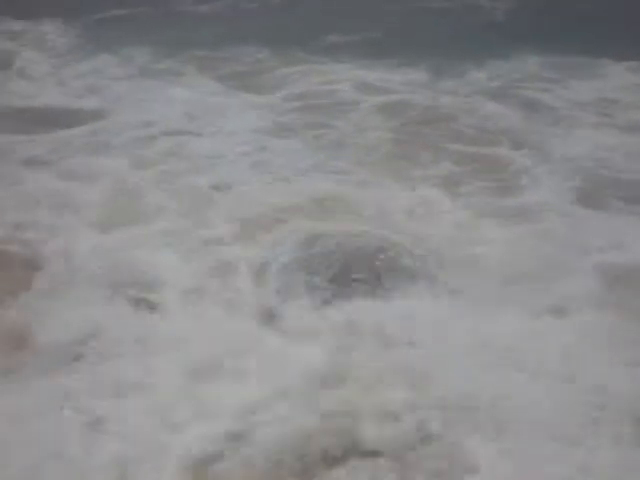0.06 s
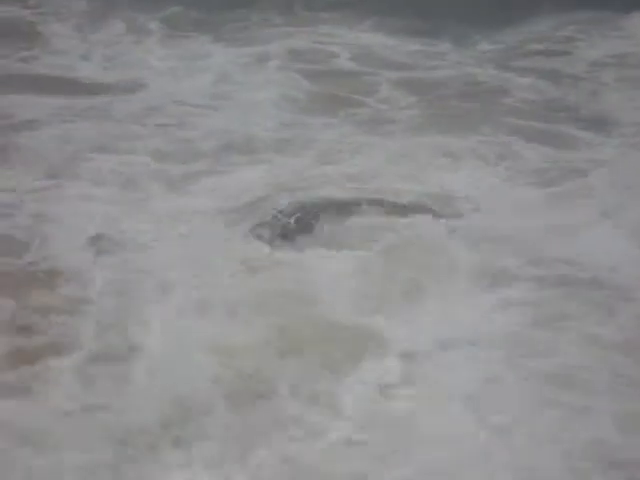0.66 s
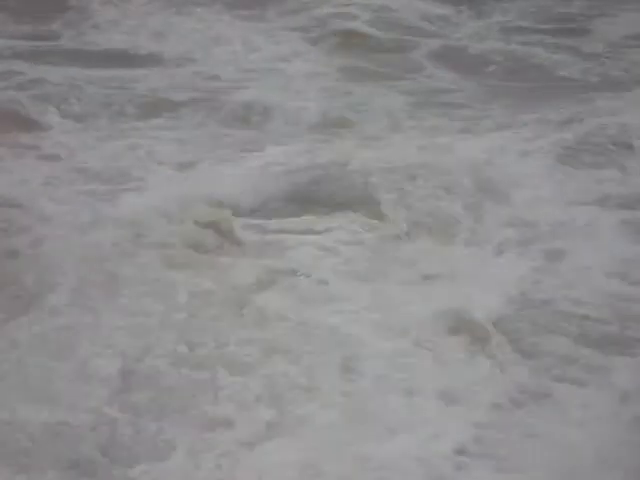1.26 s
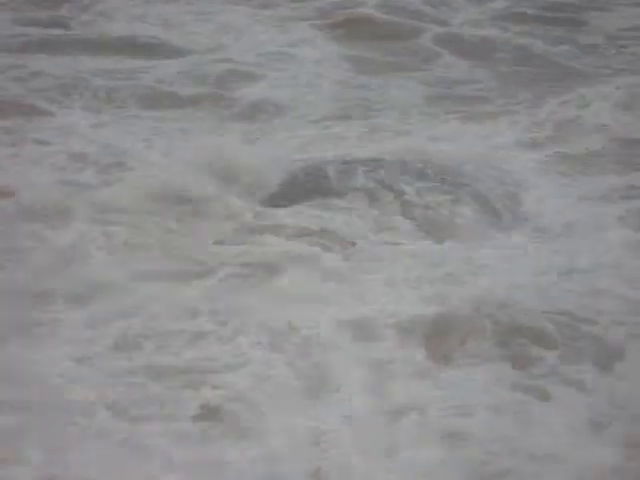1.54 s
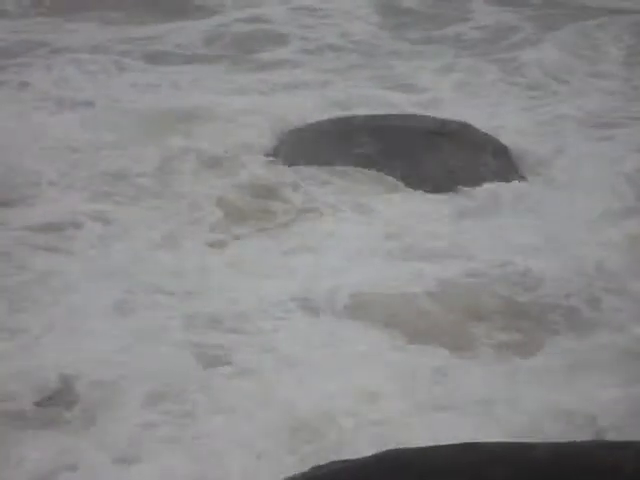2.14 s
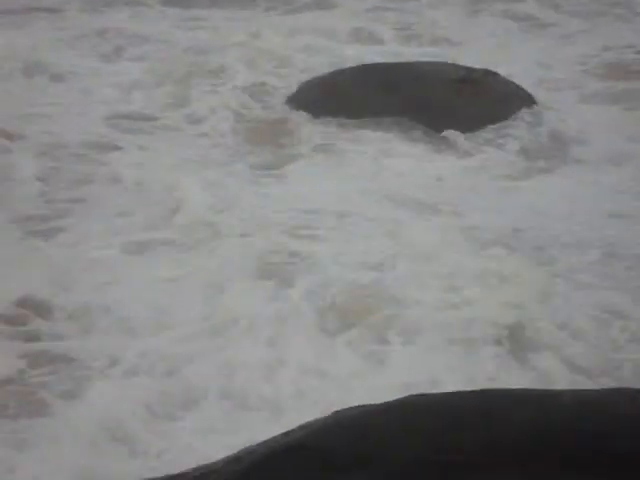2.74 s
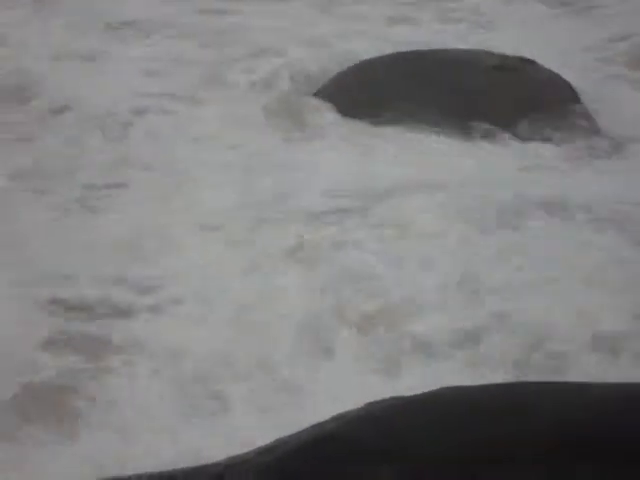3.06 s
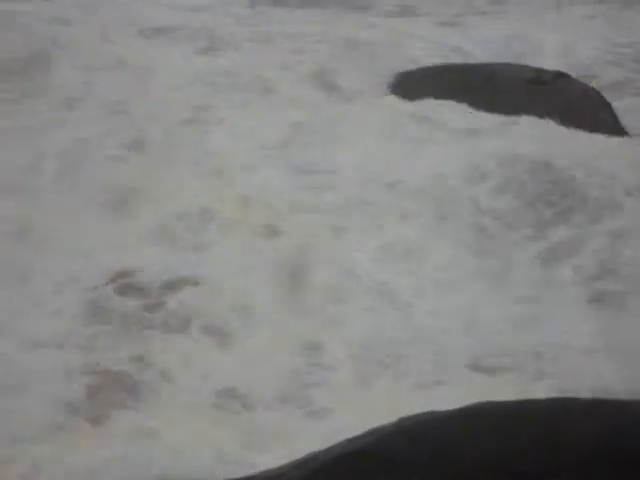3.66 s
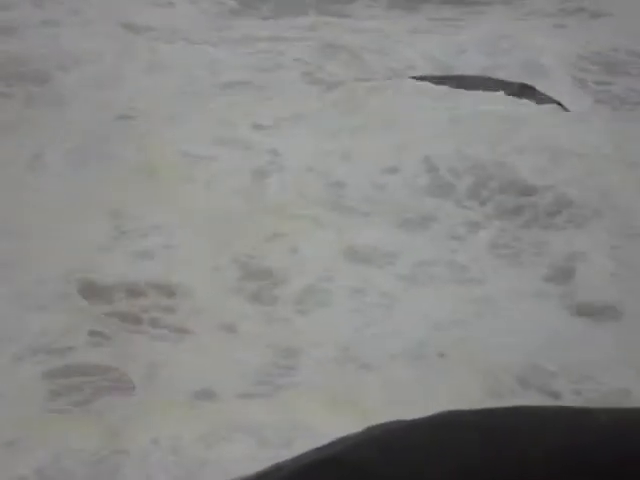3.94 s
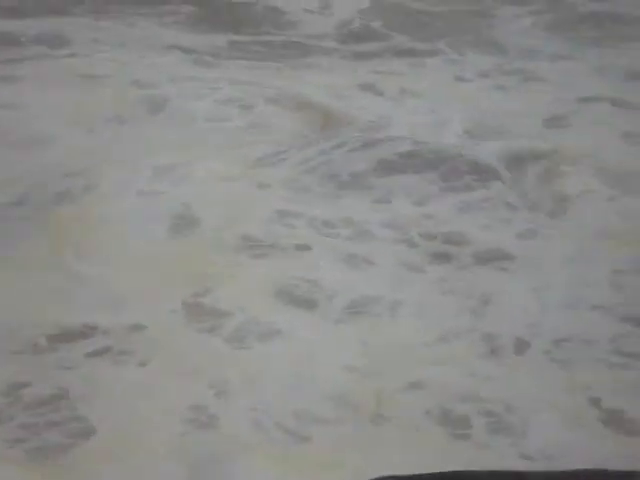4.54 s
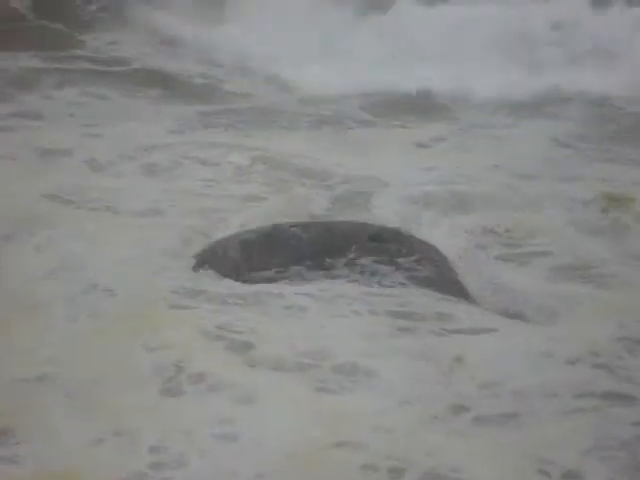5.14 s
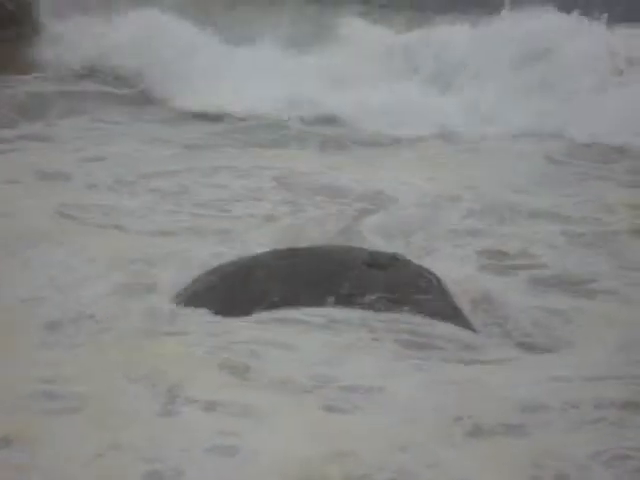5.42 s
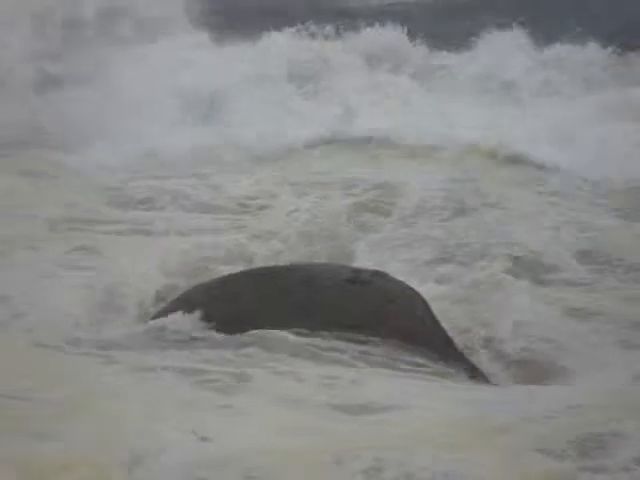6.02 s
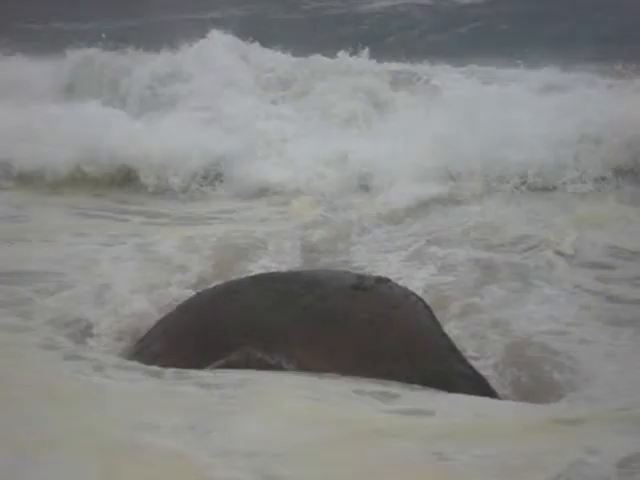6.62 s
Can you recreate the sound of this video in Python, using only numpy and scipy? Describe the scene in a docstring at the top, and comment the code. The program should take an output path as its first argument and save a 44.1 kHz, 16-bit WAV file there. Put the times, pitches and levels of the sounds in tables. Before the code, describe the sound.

Heavy surf washes around boulders on a rocky shore in a loud, continuous rush. White water churns and foam fizzes over a deep roar, while surges gush across the rocks with short slaps and faint hollow gulps. From about halfway, the next breaker rolls closer, adding a fuller rumble and soft distant booms. The microphone softens the highest treble.

```python
"""Heavy surf on boulders

Waves wash around shore boulders while the next breaker rolls in. Air beaten into the water rings,
and bigger bubbles ring lower: big plumes rumble, bubble clouds roar, the wash churns, foam fizzes.
Surges slap the rocks, water gushes over them and trapped pockets of air gulp."""
import sys
import numpy as np
from scipy import signal
from scipy.fft import rfft, irfft
from scipy.io import wavfile

SR = 44100
rng = np.random.default_rng(int(sys.argv[2]) if len(sys.argv) > 2 else 0)


def generate_wav(sig):
    """Save sig (samples, or channels by samples) to the path in sys.argv[1] as 16-bit PCM at SR."""
    pcm = np.round(np.clip(np.atleast_2d(sig).T, -1, 1) * 32767).astype(np.int16)
    wavfile.write(sys.argv[1], SR, pcm)


N = 303408
TIME = np.arange(N) / SR
FREQS = np.maximum(np.arange(N // 2 + 1) * SR / N, 1)


def gain(db):
    """Turn decibels into a number to multiply by."""
    return 10 ** (np.asarray(db) / 20)


def unit(x):
    """Scale a sound to an average (rms) level of 1."""
    return x / np.sqrt(np.mean(x ** 2))


def together(gains):
    """The joint level of unrelated sounds: their powers add."""
    return np.sqrt(sum(g ** 2 for g in gains))


def bell(x, centre, width):
    """A smooth bump of height 1, down to 0.6 at one width either side."""
    return np.exp(-.5 * ((x - centre) / width) ** 2)


def wander(per_s):
    """A line that drifts between random values, mostly within -1 to 1."""
    return np.interp(TIME * per_s, np.arange(1024), rng.standard_normal(1024))


def colour(x, tone):
    """Shape lows and highs by a tone table, fading beyond its ends; the level comes out as 1."""
    hz, db = np.transpose(tone)
    edges = np.minimum(1, np.minimum(FREQS / hz[0], hz[-1] / FREQS)) ** 2
    curve = gain(np.interp(np.log(FREQS), np.log(hz), db))
    return unit(irfft(rfft(x) * edges * curve, N))


def cloud(tone, churn_db, churn_per_s):
    """Countless bubbles merge into a rush; each half octave swells and fades on its own."""
    spectrum, rush = rfft(rng.standard_normal(N)), np.zeros(N)
    bands = np.floor(2 * np.log2(np.clip(FREQS, tone[0][0], tone[-1][0])))
    for band in np.unique(bands):
        rush += irfft(spectrum * (bands == band), N) * gain(churn_db * wander(churn_per_s))
    return colour(rush, tone)


def swell(peak_s, pitch_hz, spread_hz, level_db, width_s):
    """A crowd of bubbles of like size rings, building up and dying away."""
    ring = irfft(rfft(rng.standard_normal(N)) * bell(FREQS, pitch_hz, spread_hz), N)
    return unit(ring) * gain(level_db) * bell(TIME, peak_s, width_s)


# Tone of falling water: pitch_hz, relative_db
THUD_TONE = [(20, -16.5), (40, -6.5), (58, -5), (80, -2.5), (120, -11)]
# Heavy water slamming down further out: peak_s, level_db
BOOMS = [(.15, -45), (3.82, -41), (5.29, -41), (5.97, -40), (6.2, -39), (6.57, -39), (6.8, -41)]

def thuds(plume_gain):
    """Falling water thuds, more softly than the plumes of air it makes, and booms further out."""
    booms = [gain(db) * bell(TIME, peak_s, width=0.077) for peak_s, db in BOOMS]
    return cloud(THUD_TONE, churn_db=2, churn_per_s=5.2) * together([gain(-16) * plume_gain] + booms)


# Trapped air pockets: peak_s, pitch_hz, level_db, width_s
GULPS = [(.12, 346, -30, 0.14), (0.147, 910, -28, 0.073), (2.15, 750, -26, .046), (2.454, 685, -28, 0.01),
         (2.57, 526, -25, 0.053), (3.868, 561, -31, 0.045), (3.95, 314, -31.5, 0.16),
         (5.263, 462, -26, .05), (6.015, 790, -25, 0.037), (6.05, 432, -31, .04), (6.496, 405, -29, 0.046)]

def gulps(spread_hz=30):
    """Air closed in between boulders rings near one pitch."""
    return sum(swell(peak_s, hz, spread_hz, db, width_s) for peak_s, hz, db, width_s in GULPS)


# Rushes of water: peak_s, pitch_hz, level_db, width_s
GUSHES = [(1.02, 2970, -30, 0.56), (1.17, 6240, -33, .12), (1.1, 2400, -30, 0.046), (1, 1260, -32, 0.47),
          (1.58, 1370, -29.5, 0.29), (0.87, 440, -32.5, 0.22), (2.28, 190, -32, 0.26),
          (2.28, 510, -29, 0.43), (2.61, 800, -25, 0.15), (2.47, 1370, -29, 0.38), (3.2, 680, -32.5, 0.47),
          (3.89, 560, -29.5, 0.59), (3.9, 4400, -32, .25), (5.12, 4130, -32.5, 0.52),
          (6.1, 3400, -35, 0.84)]

def gushes():
    """Water pours over and between boulders, ringing over a broad range of pitches."""
    return sum(swell(peak_s, hz, 0.17 * hz, db, width_s) for peak_s, hz, db, width_s in GUSHES)


# Tone of a splash: pitch_hz, relative_db
SPLASH_TONE = [(150, -11), (400, -9), (1000, 5.5), (2000, -6), (3700, -5.5), (4600, -16), (8000, -27)]
# Surges hitting rock: peak_s, level_db, width_s
SLAPS = [(0.307, -24, .014), (1.877, -24.5, 0.022), (2.136, -25, 0.041), (2.45, -19, 0.018),
         (2.504, -30, 0.012), (3.718, -23.5, .014), (4.06, -24, 0.024)]

def slaps():
    """A surge meets a boulder and throws up a short splash."""
    hits = sum(gain(db) * bell(TIME, peak_s, width_s) for peak_s, db, width_s in SLAPS)
    return colour(rng.standard_normal(N), SPLASH_TONE) * hits


# Tone of foam and spray: pitch_hz, relative_db
FOAM_TONE = [(2200, -37.5), (3300, -5.5), (4100, 0.5), (5000, 0), (6000, 0), (7000, -2.5), (7900, -4),
             (9000, -12.5), (10000, -24)]

def foam(clicks=18000, spread_db=2.0):
    """Tiny bubbles fizz; landing drops and bursting foam add clicks of very unequal size."""
    fizz = cloud(FOAM_TONE, churn_db=1.26, churn_per_s=38)
    when, strength, sign = rng.random((clicks, 3)).T
    sizes = gain(-spread_db * np.log(1 - .995 * strength)) * np.sign(sign - .5)
    spray = np.bincount((when * N).astype(int), sizes, N)
    return fizz + gain(-3) * colour(spray, FOAM_TONE)


def bubbles(low_hz, high_hz, cycles, glide, spread_db, count):
    """Single nearby bubbles ring briefly and rise in pitch as they reach the surface."""
    sound = np.zeros(N)
    for when, smallness, strength in rng.random((count, 3)):
        hz = low_hz * (high_hz / low_hz) ** smallness
        start = int(when * N)
        t = TIME[:min(int(cycles / hz * SR), N - start)]
        age = t * hz / cycles  # 0 to 1 over the bubble's life
        ring = np.sin(2 * np.pi * hz * t * (1 + glide * age / 2)) * np.exp(-np.log(100) * age)
        sound[start:start + len(t)] += gain(-spread_db * np.log(1 - .99 * strength)) * ring
    return sound


def boulder_echo(x, path_m, sway_m, echo_db):
    """A boulder throws the sound back; the echo's extra path changes as the water moves."""
    delay_s = (path_m + sway_m * wander(2)) / 343  # sound travels 343 m a second
    return unit(x + gain(echo_db) * np.interp(TIME - delay_s, TIME, x))


# Tone of the wash: pitch_hz, relative_db
WASH_TONE = [(600, -13.5), (1000, -6.5), (1280, -1), (1550, -3), (1880, -4), (2150, -5), (2600, -5.5),
             (3350, -7.5), (4100, -13.5), (5500, -37)]

def wash():
    """Water churns beside a boulder: a rush of bubbles with single ones ringing in it."""
    rush = cloud(WASH_TONE, churn_db=0.12, churn_per_s=20)
    rings = bubbles(low_hz=664, high_hz=3700, cycles=12, glide=0.13, spread_db=1.0, count=3500)
    water = rush + gain(-9) * colour(rings, WASH_TONE)
    return boulder_echo(water, path_m=0.602, sway_m=0.077, echo_db=-24)


# Sheets of white water: peak_s, rise_s, fall_s, wash_db, foam_db
SHEETS = [(.07, .1, 0.11, -27.5, -33.5), (1.08, 0.61, 0.12, -31, -29), (1.28, 0.035, 0.055, -31, -31.5),
          (1.5, 0.087, 0.25, -27.5, -30.5), (1.9, 0.067, 0.25, -30, -31.5), (2.45, 0.39, 0.2, -27, -36),
          (2.82, 0.14, .08, -30, -37), (3.52, 0.079, 0.14, -29, -32.5), (3.72, 0.14, .12, -27, -32),
          (4.02, 0.2, 0.072, -25, -30), (4.85, 0.65, .4, -28, -32), (6.15, 0.34, 0.11, -29.5, -34),
          (6.75, 0.75, 0.32, -27.5, -33)]

def white_water(calm_wash_db=-27.5, calm_foam_db=-34):
    """Wash and foam swell with each sheet of water that spreads and collapses."""
    wash_gains, foam_gains = [gain(calm_wash_db)], [gain(calm_foam_db)]
    for peak_s, rise_s, fall_s, wash_db, foam_db in SHEETS:
        sheet = bell(TIME, peak_s, np.where(TIME < peak_s, rise_s, fall_s))
        wash_gains.append(gain(wash_db) * sheet)
        foam_gains.append(gain(foam_db) * sheet)
    tumble = wander(22.34)  # toppling crests shake wash and foam together
    churn = wash() * together(wash_gains) * gain(0.34 * tumble)
    fizz = foam() * together(foam_gains) * gain(0.29 * tumble)
    return churn + fizz


# Air under the breaker: peak_s, pitch_hz, spread_hz, level_db, width_s
BREAKER_AIR = (6, 854.5, 72, -30, 1.2)

def breaker():
    """Air trapped under the incoming breaker rings hollow."""
    return swell(*BREAKER_AIR)


# Plunging surges: peak_s, width_s, level_db, depth_db (added for each step up in bubble size)
SURGES = [(.07, 0.2, -24, -1), (0.644, 0.29, -26, -5), (1.367, 0.032, -26, 1), (1.585, 0.11, -28, 2),
          (2.19, 0.2, -29.5, 4), (2.44, 0.096, -24, -0.5), (2.88, 0.28, -34.5, 4), (3.506, 0.096, -32, 6),
          (4.066, 0.065, -24.5, -2), (4.86, 0.12, -29, 4.5), (5.285, 0.034, -26, -8),
          (6.114, 0.14, -26.5, 2), (6.703, 0.12, -24.5, 0)]

def surf_gain(size, backwash_db, wave_db, surge_db=0):
    """How loudly bubbles ring (size 0 small to 2 big): steady backwash, next wave and surges."""
    start_s, onset_s, growth_db_per_s = 3.69, 0.055, 0.52  # the next wave grows as it rolls closer
    age_s = TIME - start_s
    fade_in = (1 + np.tanh(age_s / onset_s)) / 2
    wave = gain(wave_db + growth_db_per_s * age_s) * fade_in
    surges = [gain(surge_db + db + size * depth_db) * bell(TIME, peak_s, width_s)
              for peak_s, width_s, db, depth_db in SURGES]
    return together([gain(backwash_db), wave] + surges)


# Tones of big plumes, deep clouds and small clouds of bubbles: pitch_hz, relative_db
PLUME_TONE = [(50, -28.5), (85, -8), (110, -6), (150, -1.5), (185, -1.5), (230, -5.5), (320, -22)]
DEEP_TONE = [(150, -26.5), (205, -7), (260, -2.5), (330, -1), (420, -2), (520, -4.5), (650, -14.5),
             (1000, -25.5)]
SMALL_TONE = [(400, -20), (580, -6), (680, -3), (770, -0.5), (880, 0.5), (990, -2), (1100, -6.5),
              (1500, -19)]

def roar():
    """Falling water thuds and drives air under; each plume or cloud of bubbles rings as a whole."""
    plume_gain = surf_gain(size=2, backwash_db=-40.5, wave_db=-33.5, surge_db=-11)
    deep_gain = surf_gain(size=1, backwash_db=-28.5, wave_db=-26)
    small_gain = surf_gain(size=0, backwash_db=-25.5, wave_db=-29)
    thud = thuds(plume_gain)
    rumble = cloud(PLUME_TONE, churn_db=1, churn_per_s=21) * plume_gain
    deep = cloud(DEEP_TONE, churn_db=0.25, churn_per_s=20) * deep_gain
    small = cloud(SMALL_TONE, churn_db=-0.2, churn_per_s=18) * small_gain
    return thud + rumble + deep + small


def dip(start_s, depth_db, recovery_s):
    """The level drops briefly and comes back."""
    age_s = TIME - start_s
    return gain(depth_db * (age_s > 0) * np.exp(-np.abs(age_s) / recovery_s))


def scene():
    """The whole shore, the same in both ears."""
    sea = roar() + breaker() + white_water() + gushes() + gulps() + slaps()
    sea *= dip(start_s=.323, depth_db=-6, recovery_s=.024)
    return np.array([sea, sea])


def record(dry):
    """A small camera microphone cuts off the highest treble."""
    top_hz = 10000
    return signal.sosfilt(signal.ellip(10, .2, 75, top_hz, fs=SR, output="sos"), dry)


dry = scene()
out = record(dry)
generate_wav(out)
```